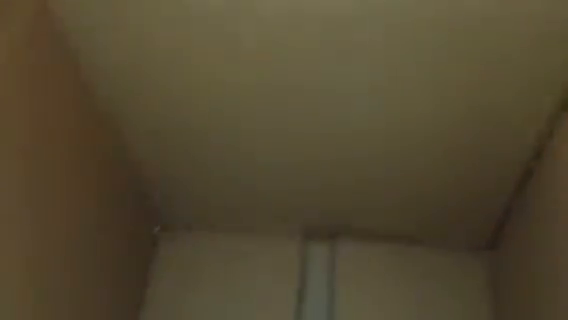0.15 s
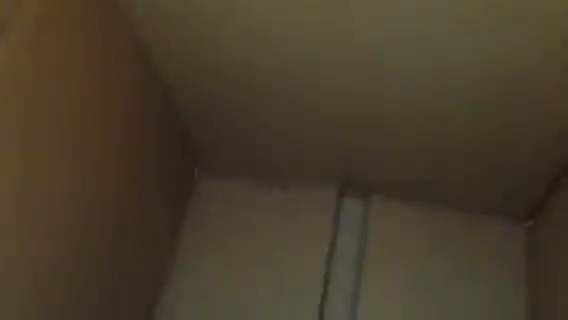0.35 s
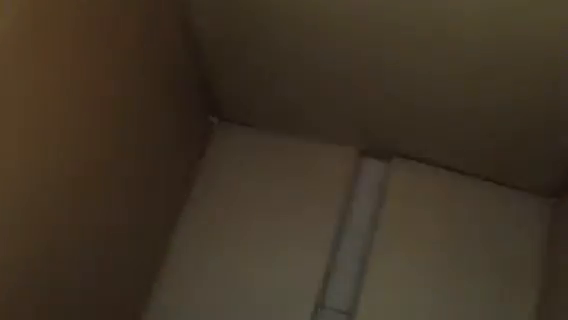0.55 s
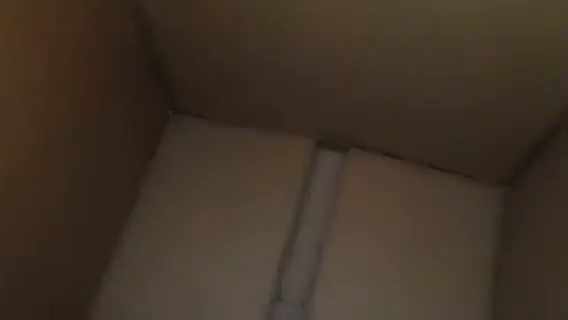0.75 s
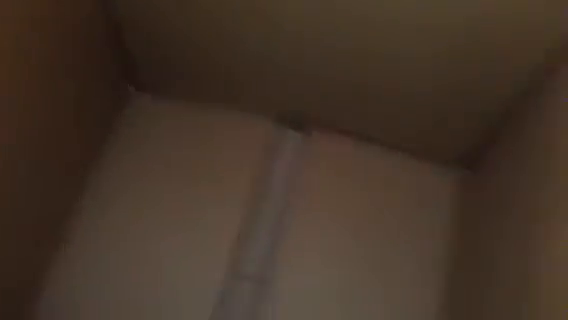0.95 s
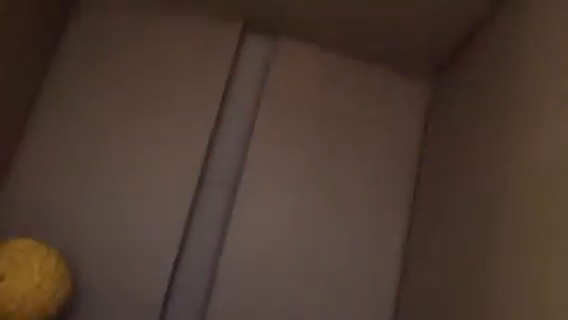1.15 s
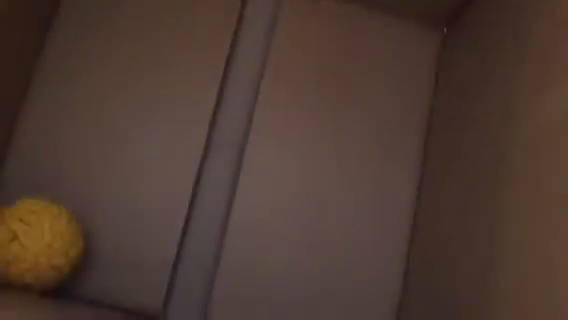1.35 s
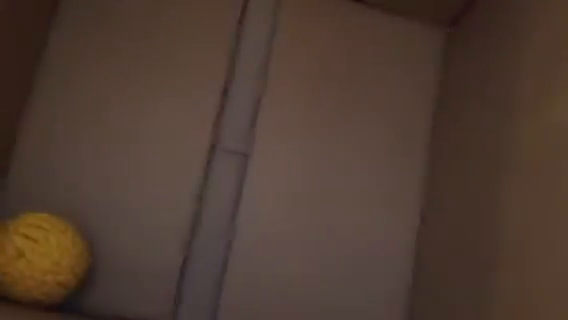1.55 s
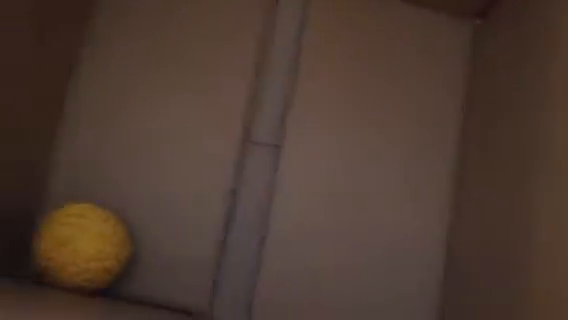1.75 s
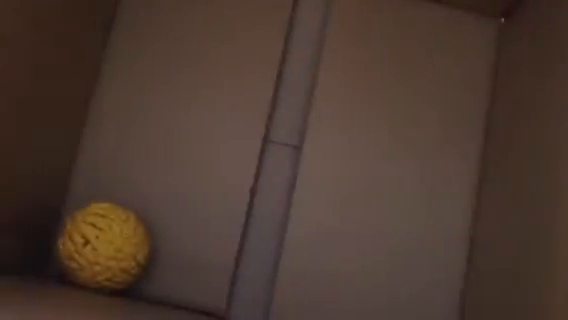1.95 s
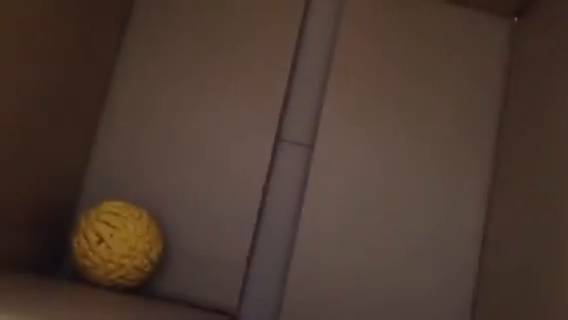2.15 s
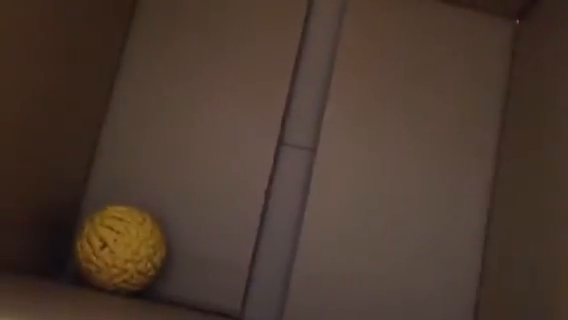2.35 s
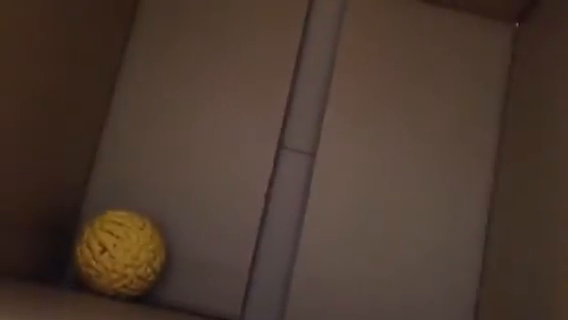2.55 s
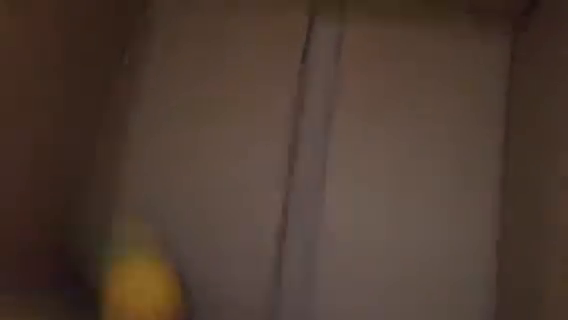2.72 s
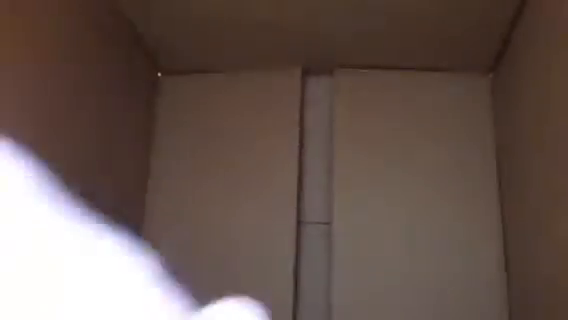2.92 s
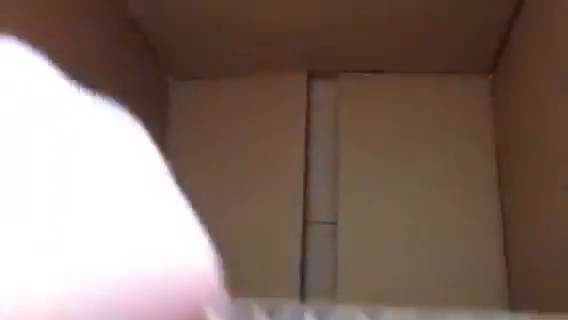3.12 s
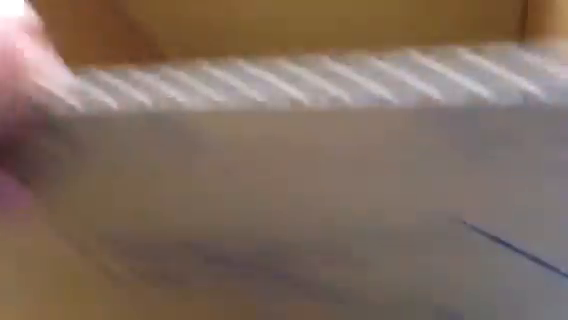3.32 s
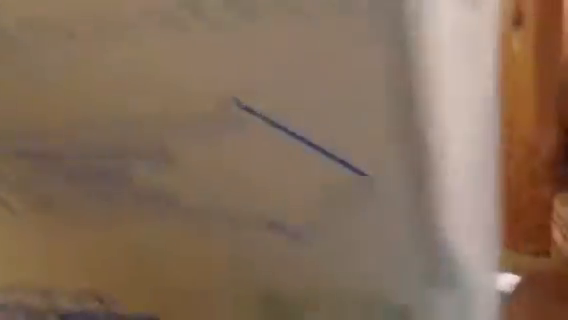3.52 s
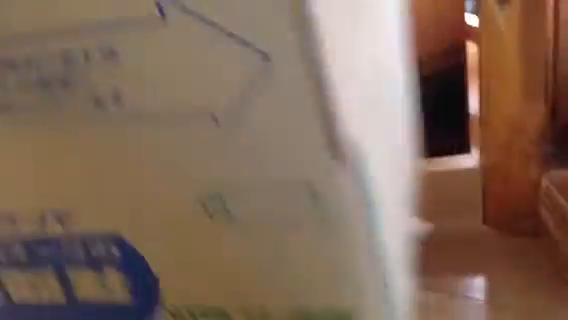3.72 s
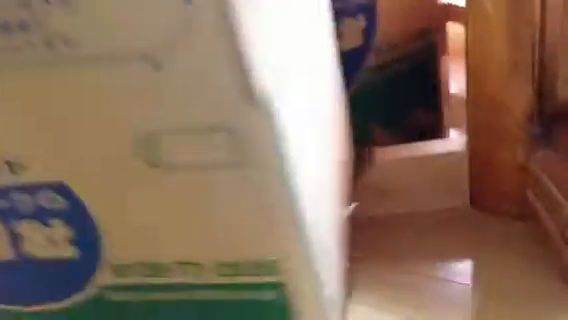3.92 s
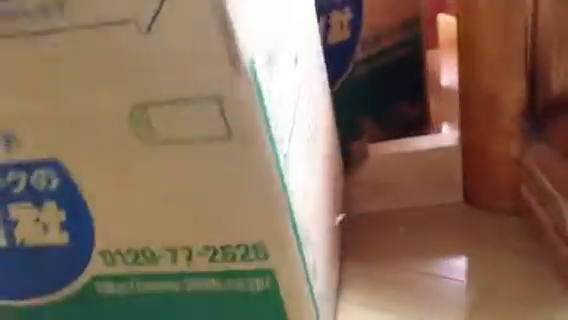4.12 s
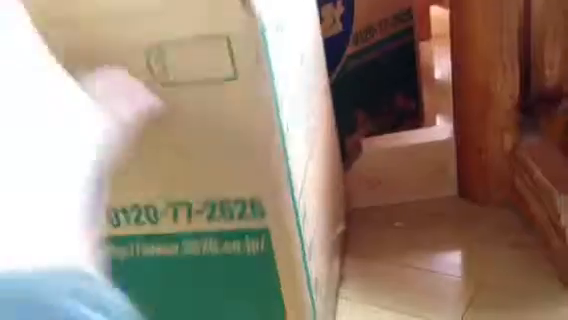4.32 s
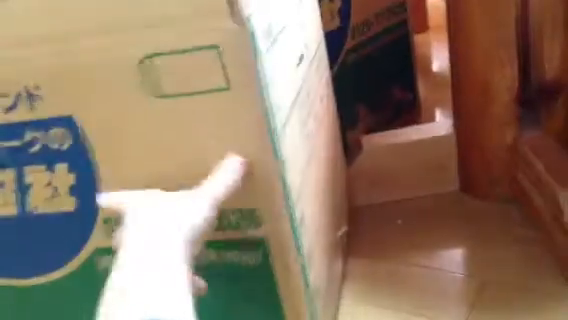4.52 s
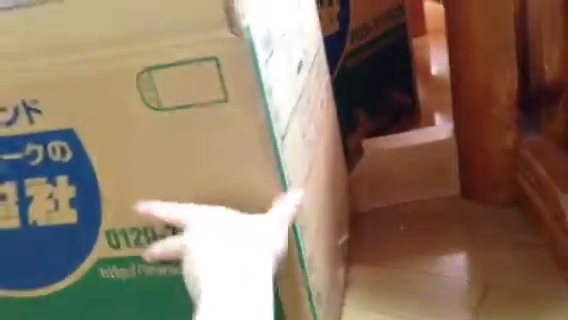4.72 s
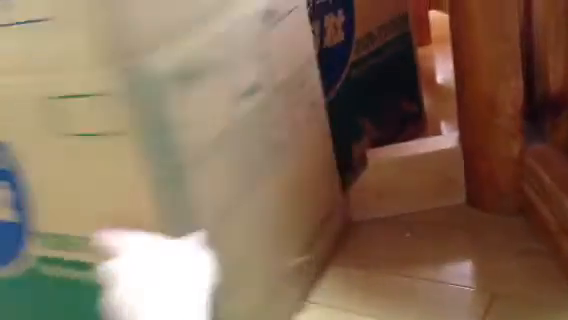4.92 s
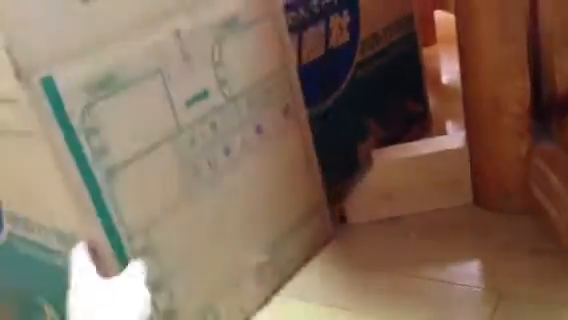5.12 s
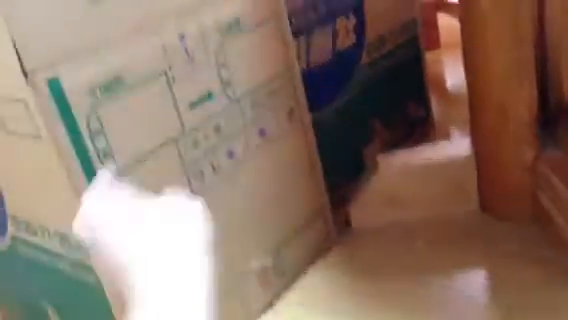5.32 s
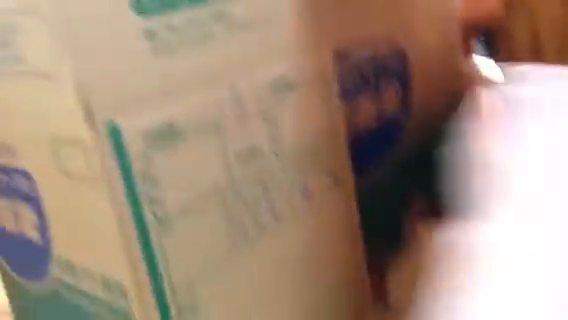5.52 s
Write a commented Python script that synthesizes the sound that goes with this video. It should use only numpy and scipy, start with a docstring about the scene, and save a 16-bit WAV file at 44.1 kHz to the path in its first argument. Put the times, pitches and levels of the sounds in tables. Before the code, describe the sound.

In a small room, close to a phone microphone, a cardboard box is lightly dragged and rubbed with papery rasps, faint ticks and soft bumps. After a short near-quiet pause, firmer strokes scrape in quick succession, with sharp snaps and hollow thuds at their loudest for about two seconds. A weak last drag with a few soft blows fades into faint steady room noise.

```python
"""Cardboard boxes on a wooden floor, close to a phone microphone in a small room with a faint steady noise.
First a light drag, stick-slip noise through the board's resonances, with faint snaps, thuds and strokes.
From 2.6 s firmer strokes follow one another; each rings the spot it rubs. From 2.9 to 4.6 s come the
strongest thuds (damped wall flexure and box modes) and snaps (short noise bursts), over a second drag.
A last light drag with a few weaker blows dies away."""
import sys
import numpy as np
from scipy import signal
from scipy.fft import rfft, irfft, next_fast_len
from scipy.io import wavfile
from scipy.ndimage import map_coordinates

SR = 44100
rng = np.random.default_rng(int(sys.argv[2]) if len(sys.argv) > 2 else 0)


def inscribe(sig):
    """Save sig as 16-bit PCM at rate SR to the path in sys.argv[1].

    A 1-D sig is mono; a 2-D sig holds one channel per row.
    Samples are clipped to [-1, 1] before scaling.
    """
    pcm = np.round(np.clip(np.atleast_2d(sig).T, -1, 1) * 32767)
    wavfile.write(sys.argv[1], SR, pcm.astype(np.int16))


N = 245195  # samples


def amp(db):
    """Level to amplitude ratio: 20 dB is a factor of ten."""
    return 10 ** (np.asarray(db) / 20)


def unit(x):
    """Normalization to an rms value of 1."""
    return x / np.sqrt(np.mean(x ** 2) + 1e-20)


def along(points, hz):
    """Linear interpolation of (f/Hz, value) points on a logarithmic frequency axis."""
    f, value = np.transpose(points)
    return np.interp(np.log(hz + 1), np.log(f + 1), value)


def wobble(rate):
    """Smooth random modulation: a spline through Gaussian knots, rate of them a second."""
    knots = rng.standard_normal(int(N * rate / SR) + 4)
    return map_coordinates(knots, [np.arange(N) * rate / SR])


def filtered(x, response):
    """Linear filtering: the spectrum is multiplied by a complex frequency response."""
    size = next_fast_len(len(x) + SR // 4)
    spectrum = rfft(x, size) * response(np.fft.rfftfreq(size, 1 / SR))
    return irfft(spectrum, size)[:len(x)]


def coloured(x, spectrum):
    """Minimum-phase filtering: the folded cepstrum gives the causal filter with this spectrum."""
    size = 4096
    level_db = along(spectrum, np.fft.rfftfreq(size, 1 / SR))
    cepstrum = irfft(np.log(amp(level_db)))
    fold = np.r_[1, np.full(size // 2 - 1, 2), 1, np.zeros(size // 2 - 1)]
    impulse_response = irfft(np.exp(rfft(cepstrum * fold)))
    return signal.fftconvolve(x, impulse_response)[:len(x)]


def resonant(x, modes):
    """Modal superposition: parallel (f/Hz, width/Hz, level/dB) resonances of alternating sign."""
    def response(f):
        total = 0
        for k, (centre, width, db) in enumerate(modes):
            resonance = 1j * f * width / (centre * centre - f * f + 1j * f * width)
            total = total + (-1) ** k * amp(db) * resonance
        return total
    return filtered(x, response)


def add(track, s, sound):
    """Superposition: a sound is summed into the track from time s, in seconds."""
    part = track[max(round(s * SR), 0):][:len(sound)]
    part += sound[:len(part)]


def friction(catches, spread_db, share):
    """Stick-slip: fibres catch and let go at random, catches a second on average, over a smooth slide."""
    caught = rng.random(N) < catches / SR
    strength = rng.standard_normal(N) * amp(spread_db * np.minimum(rng.exponential(size=N), 4))
    # share is the part of the power that lies in the catches
    return np.sqrt(share) * unit(caught * strength) + np.sqrt(1 - share) * rng.standard_normal(N)


def pressure(start, end):
    """Contact force of a stroke: a half sine to a power, pressing down and easing off."""
    return np.abs(np.sin(np.linspace(0, np.pi, round(end * SR) - round(start * SR)))) ** 1.4


# Long light drags over the board, each a list of points: t/s, rasp level/dB, hiss level/dB (relative)
DRAG_PATHS = [
    [(0.0, -52, -57.5), (0.228, -51, -56.5), (0.648, -53, -61.5), (0.766, -56.5, -64.5), (0.982, -55, -65),
     (1.218, -54, -62), (1.37, -52, -56), (1.59, -60, -67)],
    [(3.55, -66.5, -69), (3.812, -61, -67.5), (4.078, -58, -60.5), (4.23, -53, -50), (4.358, -58, -70),
     (4.51, -55.5, -51.5), (4.648, -59, -56.5), (4.76, -64.5, -67)],
    [(4.83, -59, -65.5), (4.918, -55.5, -57.5), (5.03, -54.5, -61), (5.094, -54.5, -55),
     (5.188, -56.5, -63), (5.328, -68, -73), (5.56, -73, -76)],
]


def contact(lift_db_per_s=235, drag_wall_db=-3):
    """Incoherent addition: drags and strokes sum in power to the gains of rasp, wall rumble and hiss."""
    t, power = np.arange(N) / SR, np.zeros((3, N))
    for drag in DRAG_PATHS:
        s, rasp_db, hiss_db = np.transpose(drag)
        # the level falls off outside the drag, as it sets in or lifts off
        lift = lift_db_per_s * np.abs(t - np.clip(t, s[0], s[-1]))
        for layer, db in zip(power, (rasp_db, rasp_db + drag_wall_db, hiss_db)):
            layer += amp(np.interp(t, s, db) - lift) ** 2
    for start, end, db, wall_db, hiss_db, *_ in RUBBING_STROKES:
        for layer, over_db in zip(power, (0, wall_db, hiss_db)):
            add(layer, start, (amp(db + over_db) * pressure(start, end)) ** 2)
    return np.sqrt(power)


def crackle(centre_hz=2000, octaves=0.7, t60=0.014, spread_db=3, count=700):
    """Damped free vibration: flutes and torn fibres flick past as short grains, each of its own pitch."""
    out, t = np.zeros(N), np.arange(SR // 40) / SR
    times = rng.uniform(0, N / SR, count)
    chances = np.clip(rng.standard_normal((count, 2)), -2, 2)
    for s, (pitch, size) in zip(times, chances):
        tone = np.sin(2 * np.pi * centre_hz * 2 ** (octaves * pitch) * t)
        add(out, s, tone * amp(spread_db * size - 60 * t / t60))
    return unit(out)


# Stiff resonances of the board: f/Hz, width/Hz, level/dB (relative)
BOARD_MODES = [(870, 46, 4), (1190, 65, 13), (1600, 90, -8), (2330, 70, 11), (2720, 50, 7),
               (4900, 1500, -9)]
# Spectral densities of the rasp, the wall's rumble and the fibre hiss: f/Hz, level/dB per Hz (relative)
RASP_SPECTRUM = [(350, -14), (560, 3), (680, 0), (850, 3.5), (1500, 2), (2500, 4.5), (3400, 0.5), (4800, 0),
                 (7000, -7), (12000, -34.5)]
RUMBLE_SPECTRUM = [(40, -40), (110, -11), (210, 0.5), (320, 4.5), (430, -4), (520, -2), (700, -27),
                   (1300, -40.5)]
HISS_SPECTRUM = [(300, -87), (2500, -29), (5000, -4.5), (7000, 2.5), (10500, 0), (13000, -6), (15400, -7.5)]


def scraping(rasp_db=-1.0, ring_db=-9, rumble_db=-1.0, hiss_db=0.5, grit_db=-12, crackle_db=-8,
             judder_db=1.5):
    """Friction-excited vibration: sliding rasps, rings the board, hisses in its fibres and rumbles the wall."""
    force, wall, fibres = contact()
    grit = amp(grit_db) * friction(catches=99, spread_db=2.0, share=1.0)
    slide = friction(catches=1800, spread_db=3, share=0.17) + grit
    rasp = amp(rasp_db) * unit(coloured(slide, RASP_SPECTRUM))
    rasp += amp(ring_db) * unit(resonant(slide, BOARD_MODES))
    rasp += amp(crackle_db) * crackle()
    hiss = amp(hiss_db) * unit(coloured(slide, HISS_SPECTRUM))
    rumble = amp(rumble_db) * unit(coloured(rng.standard_normal(N) + grit, RUMBLE_SPECTRUM))
    judder = amp(judder_db * wobble(70))
    return judder * (force * rasp + fibres * hiss + wall * rumble)


# Spectral density of the background noise: f/Hz, level/dB per Hz (relative)
QUIET_SPECTRUM = [(18, -47), (30, -5), (77, -13), (190, -9.5), (500, -17), (1140, -21.5), (13600, -25.5)]


def background(level_db=-64.5):
    """Stationary noise: Gaussian noise of fixed spectrum and level."""
    return amp(level_db) * unit(coloured(rng.standard_normal(N), QUIET_SPECTRUM))


# Reverberation time of the room: f/Hz, t60/s
ROOM_DECAY = [(120, 0.54), (400, 0.13), (2500, 0.17), (8000, 0.18), (15000, 0.093)]


def room(x, delay=.005, count=16):
    """Reverberation: noise tails decay fastest at the top; each equal stretch of sound gets a fresh one."""
    out, hop = np.zeros(N), N // count + 1
    for start in range(0, N, hop):
        hz, t, bins = signal.stft(rng.standard_normal(SR // 2), SR, nperseg=256)
        decay = amp(-60 * t / along(ROOM_DECAY, hz)[:, None])
        tail = signal.istft(bins * decay, SR, nperseg=256)[1]
        echo = signal.fftconvolve(x[start:start + hop], tail / np.linalg.norm(tail))
        add(out, start / SR + delay, echo)
    return out


# Spectral density of a crack, to be shifted to each snap's centre: f/Hz, level/dB per Hz (relative)
CRACK_SPECTRUM = [(40, -39.5), (250, 3), (700, 0), (1700, -1), (2500, 6.5), (4500, -4.5), (7000, -6),
                  (12000, -29.5)]
CRACK_HZ = 2500  # centre of the unshifted spectrum
# Sharp contacts of edges and flaps:
# t/s, level/dB (relative), centre f/Hz of the crack, tick level/dB (relative), crack t60/s
EDGE_SNAPS = [(0.099, -38, 1900, -16, 0.05), (0.167, -35, 2370, -5, 0.03), (0.35, -33, 1500, -1, 0.03),
              (0.439, -39, 2600, -8, 0.05), (0.575, -33.5, 3600, -2, 0.02), (1.0645, -15, 4600, -7, 0.016),
              (1.113, -37, 4400, -4, 0.015), (1.202, -33.5, 1100, 4, 0.04), (1.435, -25, 1400, -7, 0.065),
              (1.721, -38, 1200, -5, 0.05), (1.89, -41, 550, -22, 0.02), (2.897, -13.5, 1700, -16, 0.022),
              (2.925, -22.5, 2400, -26, 0.04), (2.946, -25, 2450, -24, 0.03),
              (3.501, -19.5, 1100, -13, 0.016), (3.507, -20, 1600, -8, 0.02), (3.53, -22, 1400, -9, 0.035),
              (3.713, -7.5, 1450, -16, 0.011), (3.869, -29, 900, -12, 0.025),
              (3.881, -20.5, 1700, -6, 0.018), (3.9265, -10, 1450, -9, 0.01),
              (4.006, -27.5, 1200, -8, 0.025), (4.352, -20.5, 4300, -24, 0.03),
              (4.367, -23, 2400, -14, 0.02), (4.381, -15.5, 2220, -2, 0.014), (4.483, -23, 1250, -13, 0.02),
              (5.374, -38.5, 6600, 7.5, 0.025)]


def snaps(rattle_t60=0.15, rattle_db=-20, attack=0.0004, scuff_db=-28, scuff_t60=0.038, ring_db=-9,
          crack_db=13, tick_db=9, crumple_db=2.2, damping_hz=6000):
    """Impulsive excitation: an edge scuffs and slaps; a crack and an uneven papery rattle ring the board."""
    lead = .02  # s of scuff before the slap
    out, t = np.zeros(N), np.arange(SR // 5) / SR - lead
    after = np.maximum(t, 0)
    onset = 1 - np.exp(-after / attack)
    scuff = amp(scuff_db - 60 * np.abs(t) / scuff_t60)
    rattle = amp(rattle_db - 60 * after / rattle_t60)
    paper = rng.standard_normal(N) * amp(crumple_db * wobble(500))
    # soft fibre soaks up the top of the crack
    damping = signal.butter(3, damping_hz, fs=SR, output="sos")

    def even(x):
        """Normalization to unit energy."""
        return x / np.linalg.norm(x)

    for s, db, centre_hz, over_db, crack_t60 in EDGE_SNAPS:
        slap = (amp(-60 * after / crack_t60) + rattle) * onset
        burst = np.roll(paper, -round(s * SR))[:len(t)] * (slap + scuff)
        shifted = [(hz * centre_hz / CRACK_HZ, level) for hz, level in CRACK_SPECTRUM]
        crack = signal.sosfilt(damping, coloured(burst, shifted))
        crack = even(crack + amp(ring_db) * resonant(crack, BOARD_MODES))
        tick = even(coloured(burst, HISS_SPECTRUM))
        add(out, s - lead, amp(db) * (amp(crack_db) * crack + amp(over_db + tick_db) * tick))
    return out


# Soft blows on a box wall: t/s, peak level/dB, settled f/Hz of the flexing wall,
# hollow tock level/dB (relative), rebound level/dB over the blow
WALL_BLOWS = [(0.156, -39, 270, -13, -34), (0.308, -35.5, 245, -22, -2), (0.578, -42, 300, -8, -8),
              (0.836, -42, 510, -7, -14), (1.066, -31, 390, -4, -5), (1.111, -28.5, 420, -6.5, -37),
              (1.342, -39, 308, 1, -12), (1.434, -31, 302, 9, -17), (1.721, -41, 327, -13, -25),
              (1.764, -39.5, 267, -9, -11), (1.887, -37, 240, -10, -33), (2.9, -16.5, 232, -15, -5),
              (2.928, -10, 225, -19, -20), (3.509, -24.5, 282, -4, -3), (3.716, -16, 261, -9, -22),
              (3.868, -20.5, 182, -12.5, -3.5), (3.904, -18, 161, -42, -20.5), (3.931, -13, 248, -13, -9.5),
              (3.998, -22.5, 168, -38, -7.5), (4.179, -28.5, 300, -5, -6.5), (4.349, -20, 151, -7, 7),
              (4.379, -10.5, 240, -12, -10), (4.454, -24.5, 256, -37, -14.5),
              (4.556, -33.5, 215, -27, -3.5), (4.872, -37.5, 159, -14, 2.5),
              (5.186, -30.5, 139, -15.5, -9.5), (5.222, -30.5, 188, -18, -1)]


def blows(rebound_s=0.019, rebound_pitch=1.14):
    """Rebound: the wall springs back and meets each blow again, now stiffer and so higher in pitch."""
    hits = []
    for s, db, hz, tock_db, rebound_db in WALL_BLOWS:
        hits.append((s, db, hz, tock_db))
        hits.append((s + rebound_s, db + rebound_db, hz * rebound_pitch, tock_db))
    return hits


# Modes of the hollow box: nominal f/Hz, level/dB (relative), t60/s
BOX_MODES = [(138.9, -5.5, 0.53), (154, -19, 0.63), (202, 8.5, 0.1), (218.6, -2, 0.17), (365.3, -9.5, 0.21),
             (424, -2, 0.2), (493, 7.5, 0.038), (611, -2, 0.08), (770, -6, 0.28)]
# Upper bending modes of a wall: nominal f/Hz, level/dB (relative)
TOCK_MODES = [(400, -6), (490, -4.5), (610, -4.5), (760, -8)]


def thuds(flex_t60=0.054, attack=0.0022, ring_db=-13, octaves=0.44, vary_db=1.5, stretch=0.062,
          relax=0.0014, tock_db=6, tock_t60=0.047, shudder_db=-15, shudder_t60=0.12):
    """Damped flexure: a bumped wall sinks in pitch as it relaxes and rings the box modes near its own pitch."""
    out, t = np.zeros(N), np.arange(SR // 2) / SR
    onset = 1 - np.exp(-t / attack)
    hz, db, t60 = np.transpose(BOX_MODES)[:, :, None]
    for s, peak_db, wall_hz, hollow_db in blows():
        level_chance, detune = rng.standard_normal((2, len(BOX_MODES), 1))
        bent_time = t + stretch * relax * (1 - np.exp(-t / relax))
        flex = np.sin(2 * np.pi * wall_hz * bent_time) * amp(-60 * t / flex_t60)
        # a firmer contact also wakes the wall's upper bending modes: a short hollow tock
        tock = np.zeros(len(t))
        for (f, level), shift in zip(TOCK_MODES, detune[:, 0]):
            tock += amp(level) * np.sin(2 * np.pi * f * (1 + 0.032 * shift) * t)
        tock *= amp(hollow_db + tock_db - 60 * t / tock_t60)
        near = 1 / (1 + (np.log2(hz / wall_hz) / octaves) ** 2)
        decay = amp(db + vary_db * level_chance - 60 * t / t60)
        modes = near * decay * np.sin(2 * np.pi * hz * (1 + 0.0323 * detune) * t)
        # loose flaps shudder after the blow and roughen its body
        shudder = unit(coloured(rng.standard_normal(len(t)), RUMBLE_SPECTRUM))
        shudder *= amp(shudder_db - 60 * t / shudder_t60)
        blow = (flex - tock + shudder + amp(ring_db) * modes.sum(0)) * onset
        add(out, s, amp(peak_db) * blow / np.abs(blow).max())
    return out


# Single strokes, whose rasp, rumble and hiss enter through contact(): start t/s, end t/s,
# rasp level/dB (relative), then rumble, hiss and ring level/dB (relative to the rasp),
# then nominal f/Hz of each resonance of the rubbed spot
RUBBING_STROKES = [ (0.192, 0.4, -53, -1, -3, -3, 850, 2200, 2500),
                   (0.629, 0.79, -55, -4, -7, 1.5, 480, 2240, 2500, 2680),
                   (0.906, 1.175, -52, -1, -10, 0, 770, 1290, 2240),
                   (1.266, 1.53, -54.5, -8, -2.5, -1, 800, 1240, 2140),
                   (1.58, 1.72, -66, 7, -8, 4, 450, 750),
                   (1.695, 1.786, -56.5, 2, -0.5, 3, 800, 1220, 2140),
                   (1.818, 1.887, -61.5, 2, -0.5, -1, 800, 2160), (2.063, 2.65, -70.5, 1, -1.5, -6, 370),
                   (2.605, 2.887, -48.5, 1, -4, -2, 620, 1990, 2550),
                   (2.807, 3.06, -43, 0.5, -5, -8, 1850, 2430),
                   (2.99, 3.078, -38, -3, -3.5, 3, 1800, 1990, 2500, 2770),
                   (3.072, 3.18, -40.5, -3.5, -2.5, 6, 1840, 2450, 2790, 2880),
                   (3.2, 3.335, -50, -2, -9, -1, 366, 1730, 2220),
                   (3.325, 3.46, -46, -1, -10.5, 4.5, 1600, 2270, 2780, 3380),
                   (3.41, 3.53, -45, 1, -11, 5.5, 495, 1140, 1500, 2280, 3080),
                   (3.492, 3.56, -37, 2, -10, 1.5, 585, 860, 1320, 3220),
                   (3.865, 3.953, -44, 14, -10, -3, 600, 1180),
                   (3.96, 4.04, -46, -1.5, -5.5, 0, 840, 1400, 2800),
                   (4.152, 4.224, -44.5, 11, 0, 6, 513, 880, 1150),
                   (4.204, 4.296, -42, 9, 2, 4, 512, 996, 2160, 2730),
                   (4.345, 4.416, -40.5, 15, -5, 3, 350, 520, 2450),
                   (4.412, 4.523, -54, 16, 6, 2, 480, 1250, 2450),
                   (4.914, 5.076, -55.5, -15, 3.5, -10, 1400),
                   (5.145, 5.312, -58, 7, -2, -4.5, 470, 1040, 2250)]


def strokes(width_hz=55, loss=0.02, glide=0.035, judder_db=2.2, damping_db_per_hz=0.0012):
    """Local resonance: the catches of a swelling, juddering, fading stroke ring the spot that is rubbed."""
    out = np.zeros(N)
    catches = friction(catches=600, spread_db=3.0, share=0.35) * amp(judder_db * wobble(120))
    for start, end, db, _, _, ring_db, *pitches in RUBBING_STROKES:
        # higher resonances are broader and ring more weakly
        modes = [(hz, width_hz + loss * hz, -damping_db_per_hz * hz) for hz in pitches]
        ring = resonant(catches[round(start * SR):round(end * SR)], modes)
        travel = np.linspace(0, 1, len(ring))
        # the contact moves toward a stiffer edge, so the ring rises a little
        ring = np.interp(travel + glide * travel * (travel - 1), travel, ring)
        add(out, start, amp(db + ring_db) * pressure(start, end) * unit(ring))
    return out


def scene():
    """Superposition of direct scrapes, snaps and thuds, their reverberation and the background."""
    scrape, snap, thud = scraping() + strokes(), snaps(), thuds()
    wet = room(amp(-14) * scrape + amp(-11) * thud + amp(-20.5) * snap)
    return (scrape + thud + snap + wet + background())[None]


def record(dry, low_cut_hz=125, top_hz=15400):
    """Band limitation: the phone thins the bass and keeps nothing above its band limit."""
    high_pass = signal.butter(2, low_cut_hz, "high", fs=SR, output="sos")
    thin = signal.sosfilt(high_pass, dry[0])
    return filtered(thin, lambda hz: hz < top_hz)[None]


dry = scene()
out = record(dry)
inscribe(out)
```